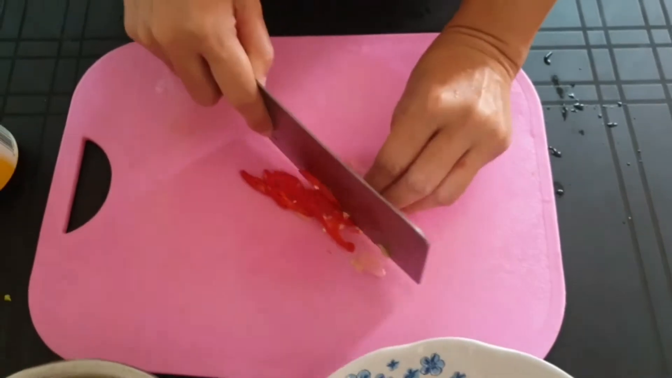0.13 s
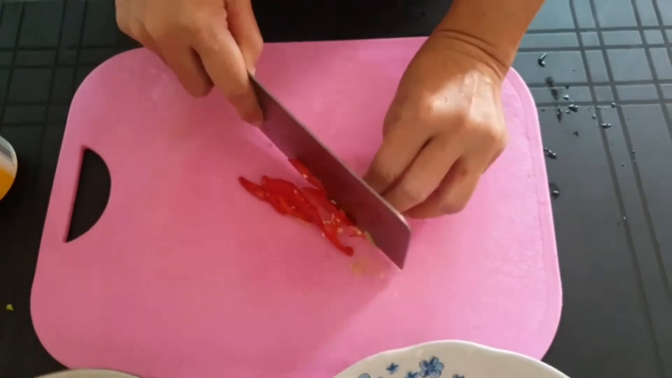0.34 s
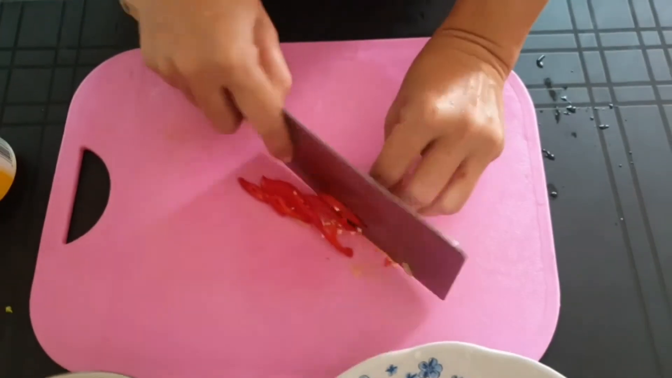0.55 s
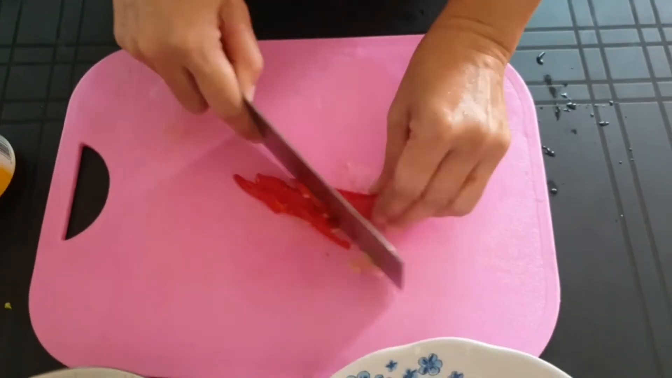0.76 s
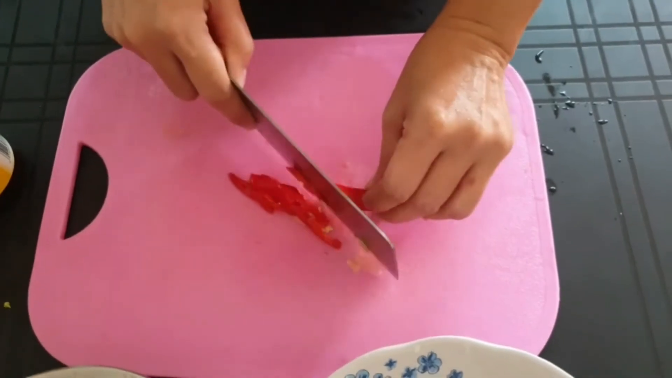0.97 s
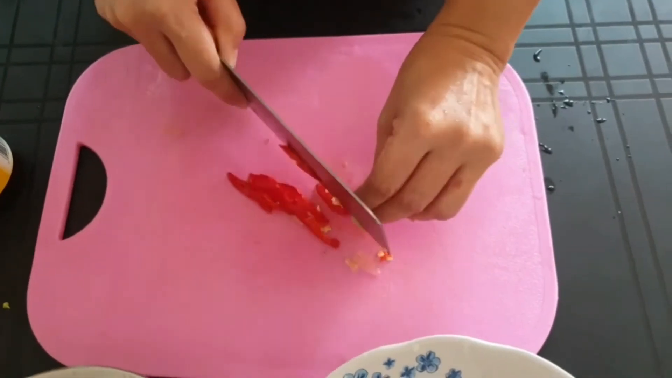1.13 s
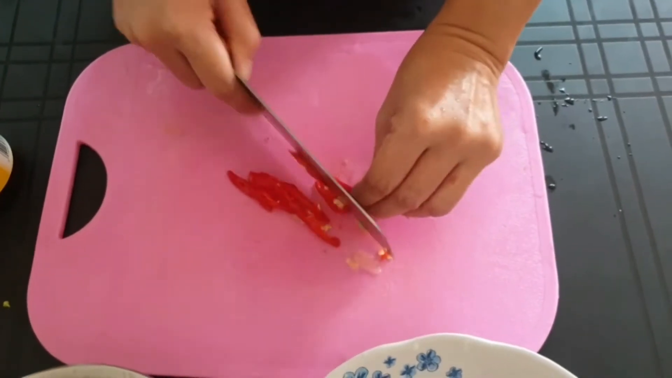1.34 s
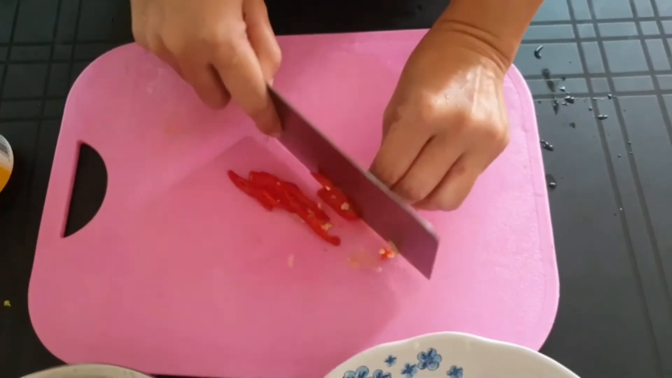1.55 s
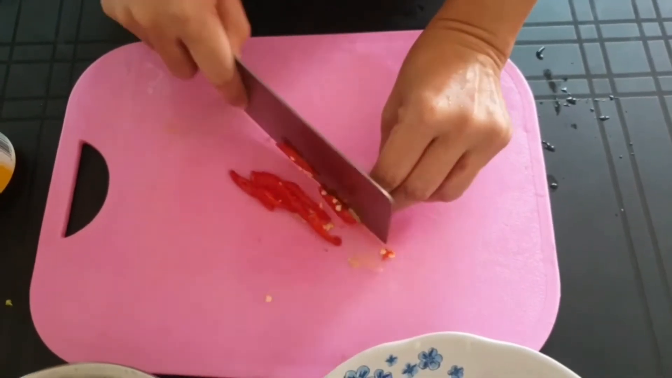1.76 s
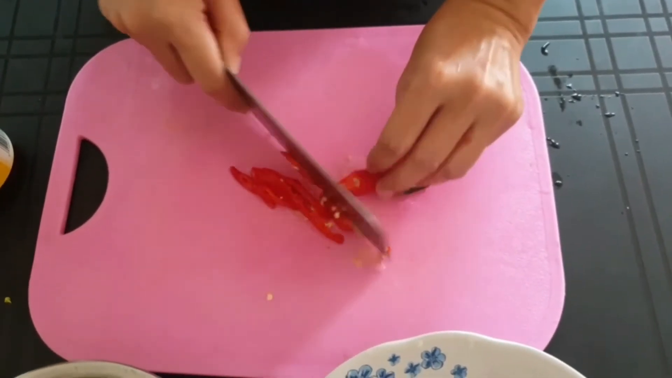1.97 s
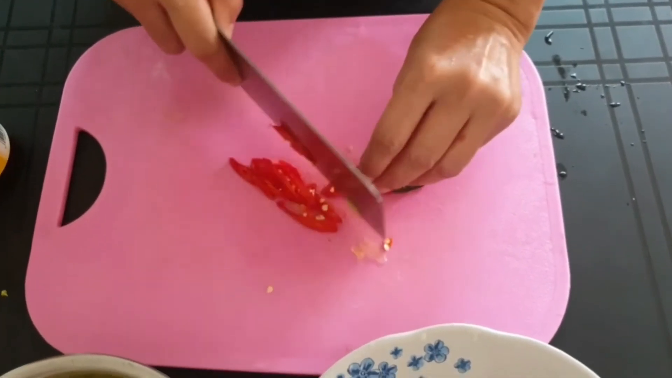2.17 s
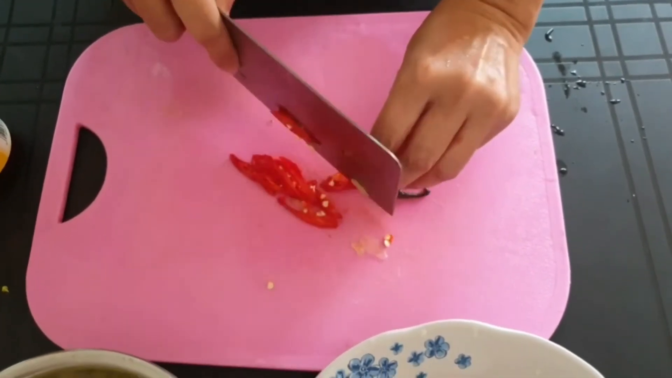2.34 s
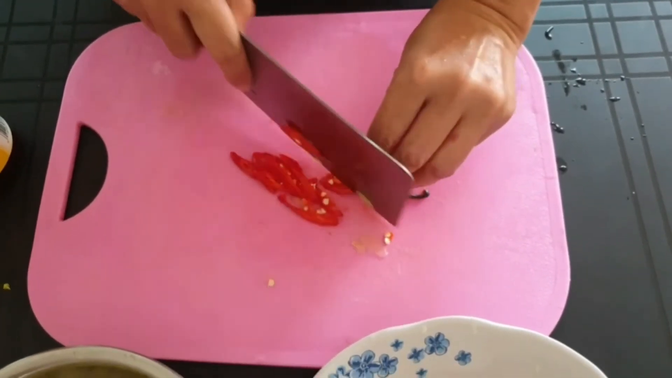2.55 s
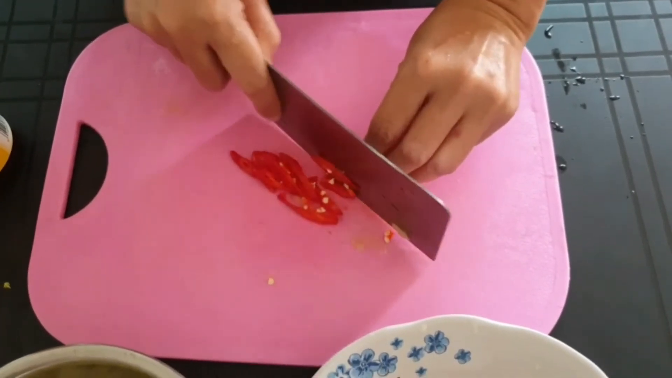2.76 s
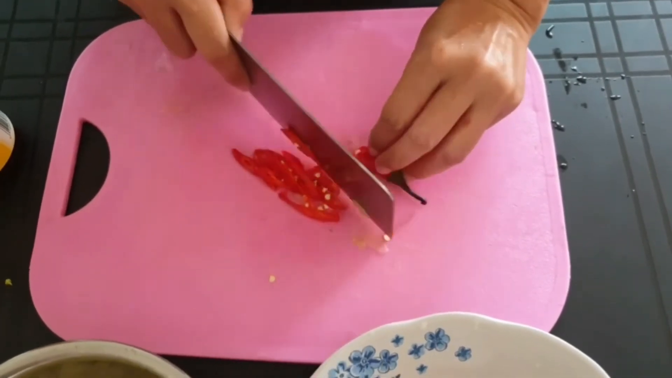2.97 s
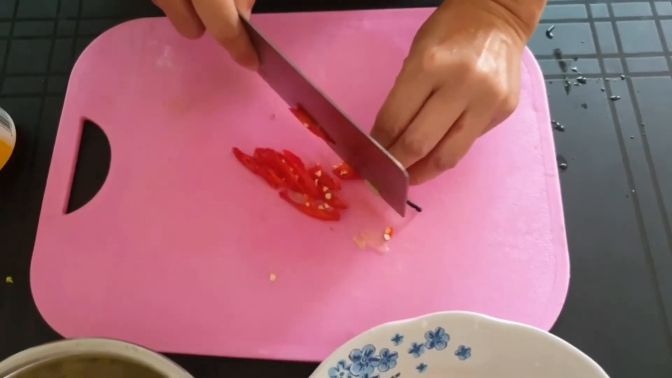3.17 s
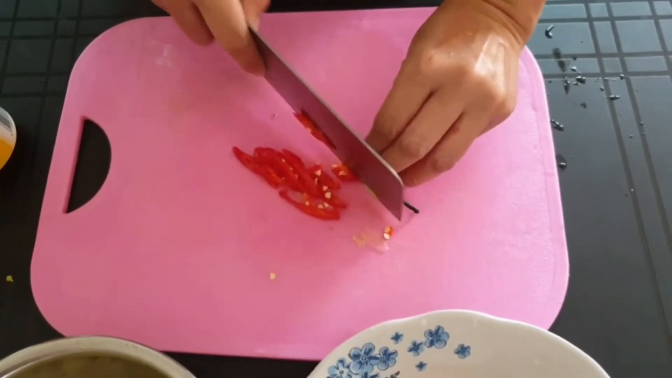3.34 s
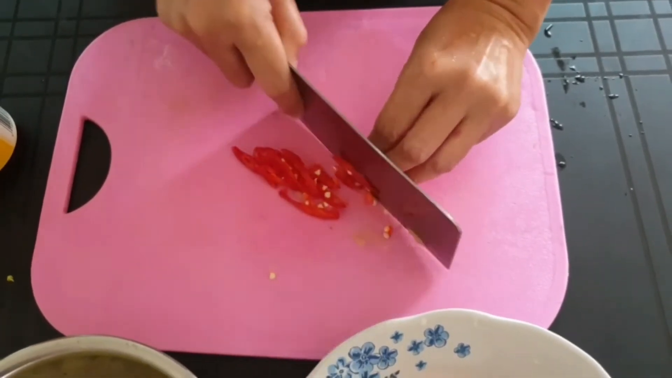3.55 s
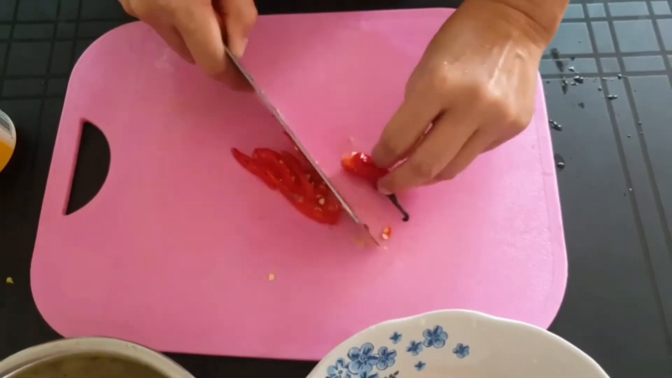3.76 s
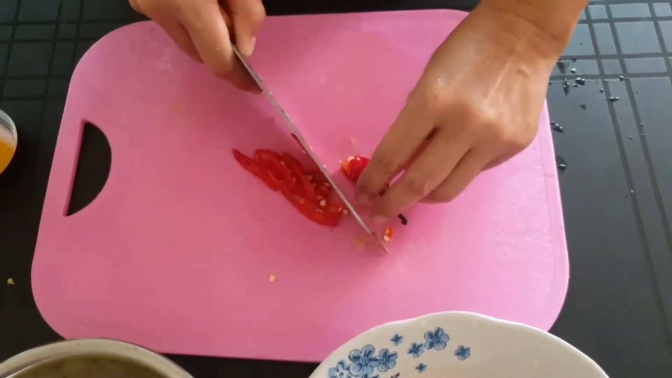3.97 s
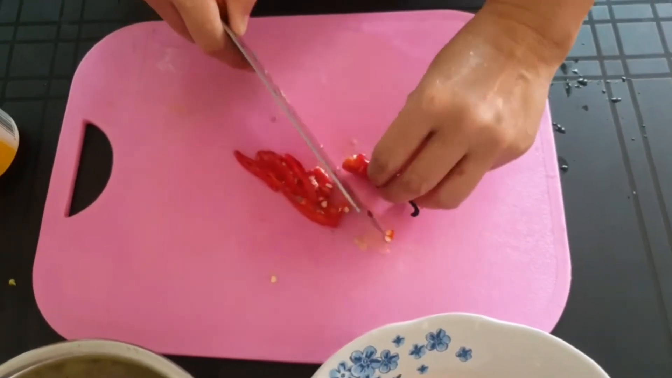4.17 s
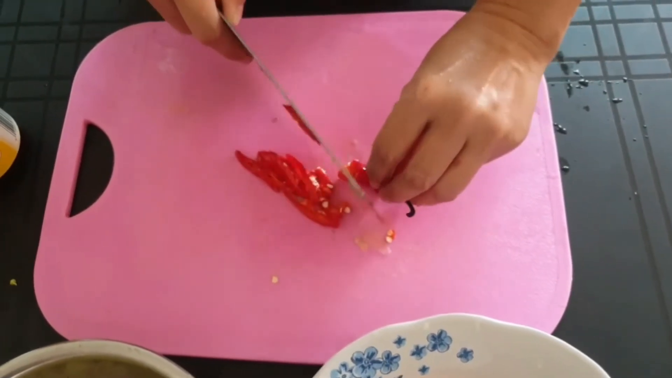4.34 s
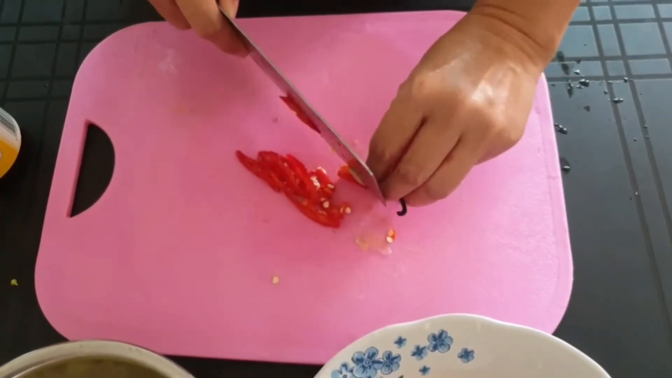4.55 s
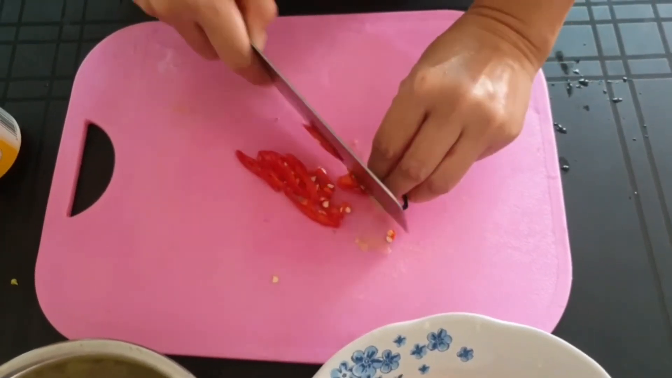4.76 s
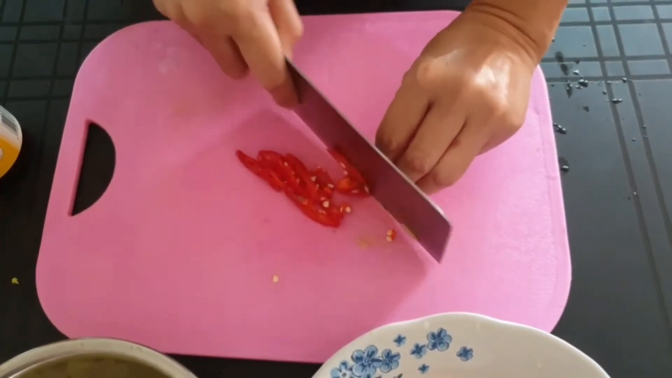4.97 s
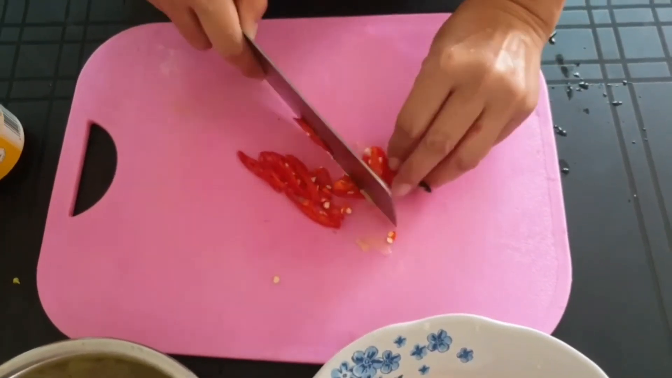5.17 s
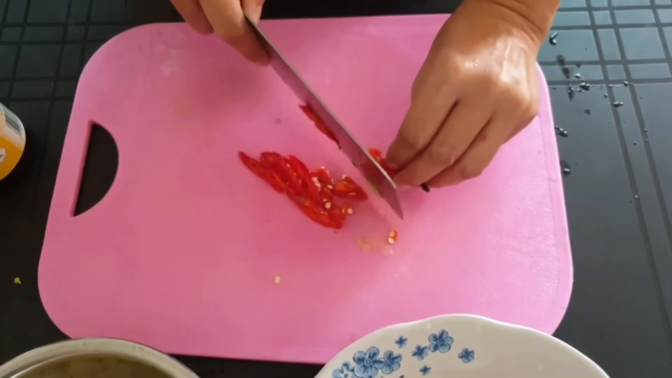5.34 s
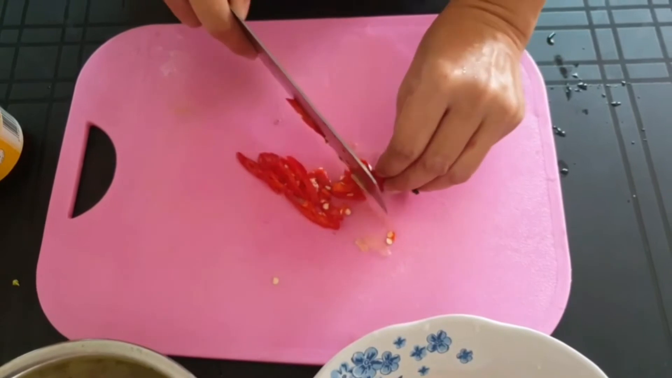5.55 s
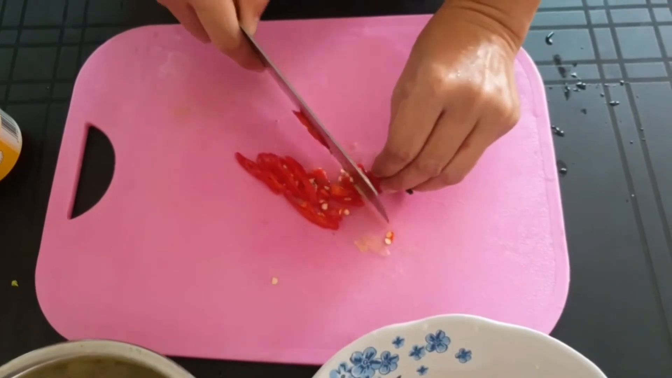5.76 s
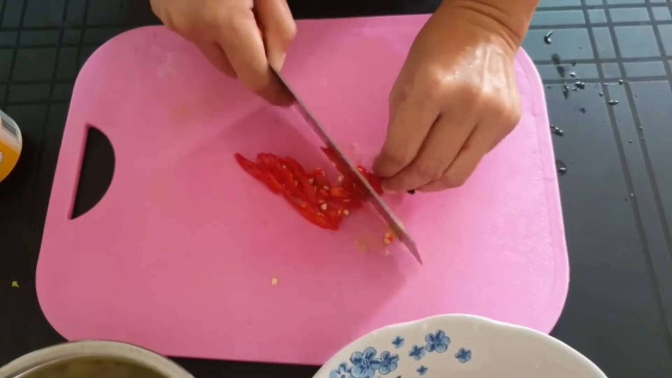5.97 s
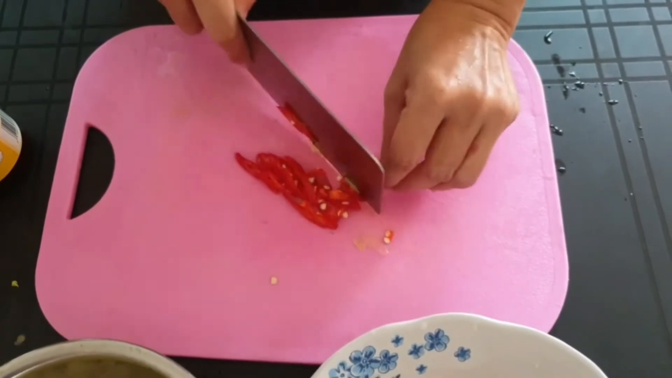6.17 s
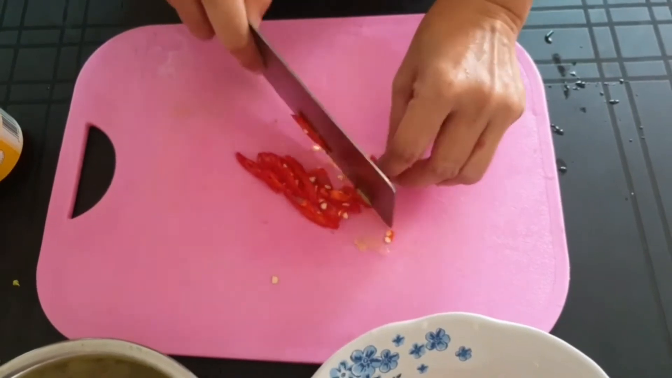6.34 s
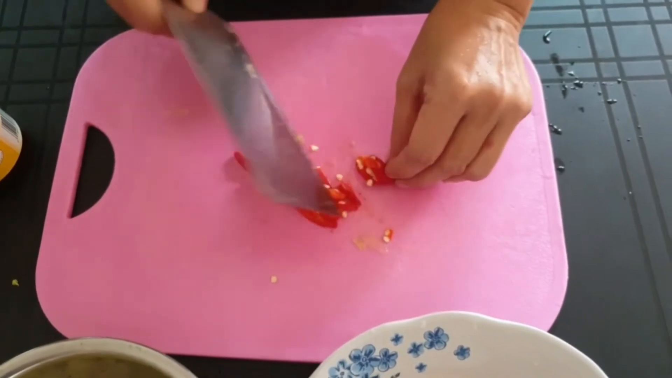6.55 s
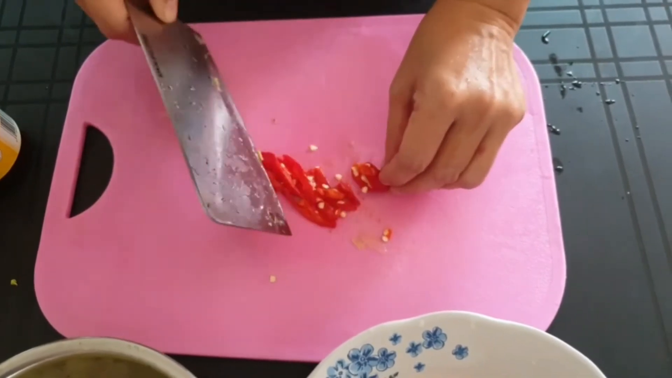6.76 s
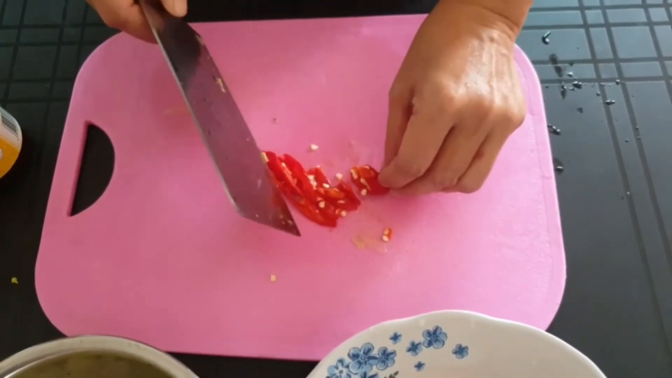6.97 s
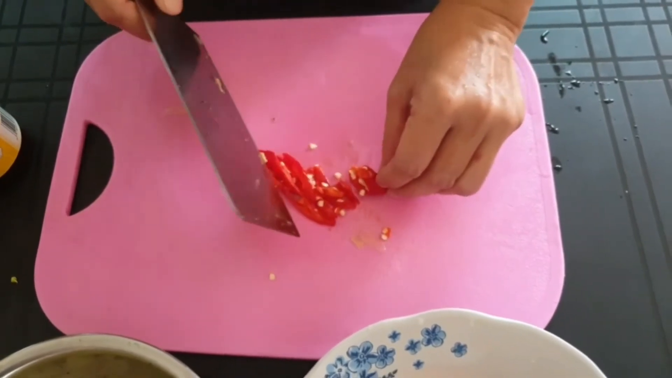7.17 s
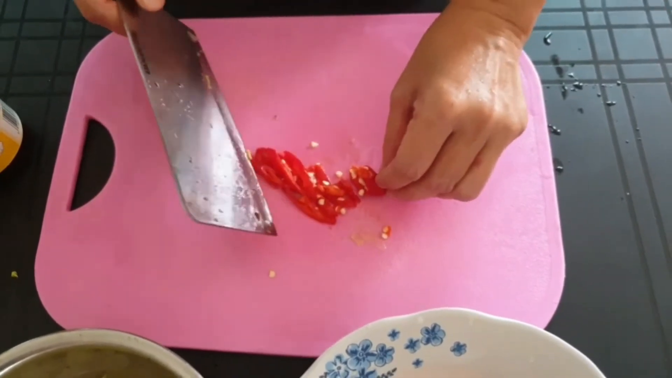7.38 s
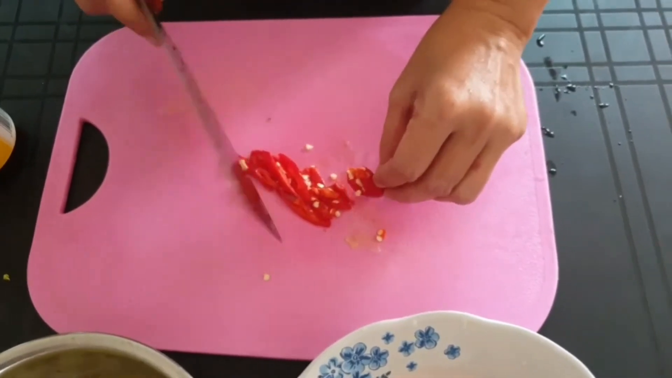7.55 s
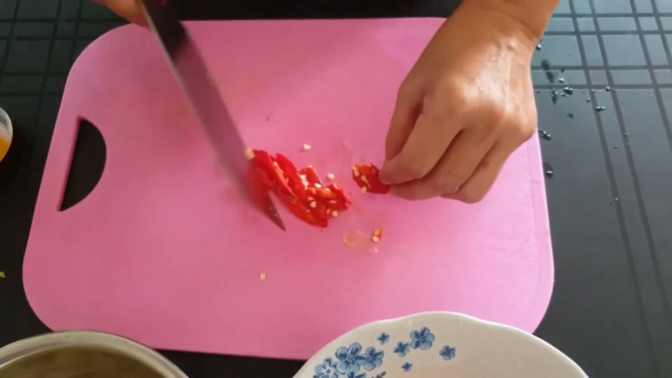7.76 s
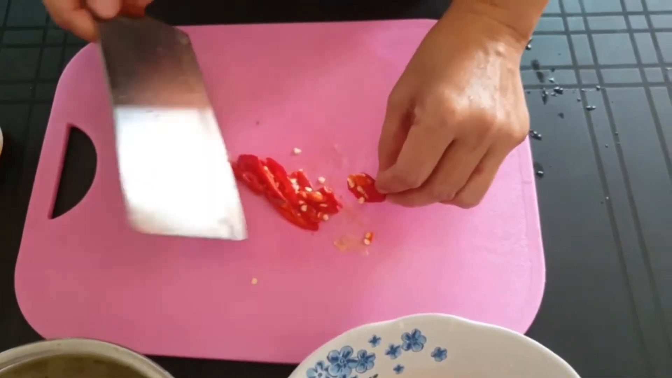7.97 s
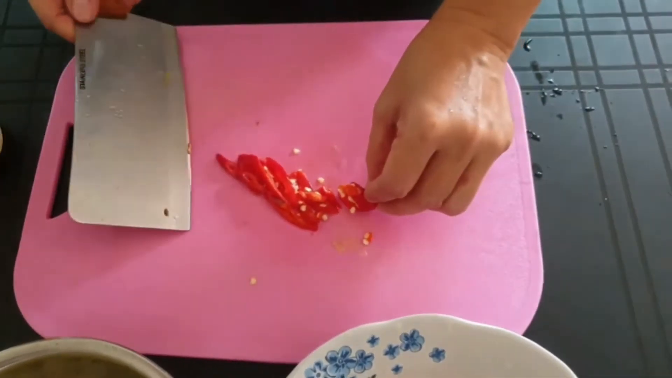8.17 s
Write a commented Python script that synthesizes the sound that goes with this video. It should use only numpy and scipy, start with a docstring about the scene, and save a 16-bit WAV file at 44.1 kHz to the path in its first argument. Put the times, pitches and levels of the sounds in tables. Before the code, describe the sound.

Close up, a cleaver pushes through chili on a thin plastic board: grainy tearing hiss, brief rasps and squeaks, sharp bright snaps, then low hollow knocks as the edge lands. Strokes come in uneven bursts with short gaps until about six and a half seconds. Then mostly quiet room air, faint insect whine, distant soft coos and two dull counter bumps. Wide stereo, small room.

```python
"""Chili sliced on a plastic board

A cleaver slices chili on a thin plastic board on a kitchen counter. Each push crunches and scrapes:
shaped noise through blade, rasp and squeak resonances, with noise bursts for snaps.
The board booms and the edge knocks down: dying sines, shaken by noise or struck.
Insects whine outside and a far bird coos (noise bands); the counter is bumped twice (sines)."""
import sys
import numpy as np
from scipy import signal
from scipy.fft import irfft
from scipy.io import wavfile
from scipy.ndimage import uniform_filter1d

SR = 44100
rng = np.random.default_rng(int(sys.argv[2]) if len(sys.argv) > 2 else 0)


def output_pcm(signal):
    """Save a mono or channel-first signal as 16-bit PCM at the path in sys.argv[1].

    Samples are clipped to [-1, 1] before scaling.
    """
    pcm = np.clip(np.atleast_2d(signal).T, -1, 1) * 32767
    wavfile.write(sys.argv[1], SR, np.round(pcm).astype(np.int16))


N = 362187

# Blade pushes. Each row: end in s, length in s, tearing reference level in dB, swell over the push in dB,
# rasp and squeak in dB against that reference, weight on the board in dB, lift of its higher modes in dB.
PUSHES = [(0.012, 0.019, -49, -7, -2.5, -3.5, -39, 4), (0.193, 0.075, -55, -0.5, -6.5, -13, -56.5, 1.5),
          (.278, 0.012, -65.5, -2, -7, -11, -67, -1), (.398, 0.0076, -70, 1, -16, -5, -39.5, -1.5),
          (0.621, 0.099, -53.5, 5, -2, -7.5, -42, 6), (.764, .004, -59.5, 1, -7, -10, -48.5, -1.5),
          (.87, 0.023, -78, 4, -2, -6, -44, -5), (1.255, 0.046, -74.5, 1, 4.5, 3.5, -85, -5),
          (1.335, 0.029, -79.5, -6, 0, 2.5, -78, -5), (1.42, 0.0067, -55.5, 3.5, -1, 1, -42, -4),
          (1.517, 0.067, -47, -1.5, -3.5, -4.5, -45.5, -3.5), (1.779, 0.082, -46, 6.5, 0, -9, -25.5, -2),
          (1.924, 0.059, -51, 4.5, -2, -6, -47, 5.5), (2.076, 0.0051, -54, 0.5, -5, -7, -45.5, -4),
          (2.492, 0.038, -80, -2, 2, -2, -65.5, 3), (2.6, 0.0095, -61, 3, -13, 4, -46, 0),
          (2.649, 0.027, -49.5, 1.5, -15, -2, -36, -9), (2.749, 0.075, -45, 4.5, -2.5, -8.5, -37.5, 0),
          (2.898, .004, -49.5, 0.5, -2.5, -5, -41, 0), (3.025, 0.024, -72, -7.5, -9, -10, -45, 6.5),
          (3.48, 0.019, -51, 2.5, -18, 0, -40, -1), (3.525, 0.018, -45, -2, -2, -4.5, -30.5, 0),
          (3.591, 0.019, -54.5, 0, 0, -4, -41, 5.5), (3.73, 0.043, -52, 7, -7.5, -8, -52.5, 6.5),
          (3.832, 0.072, -55.5, 3.5, -1, -7, -39.5, -1), (4.82, 0.045, -50.5, 2.5, -12, -6.5, -44.5, -2),
          (4.901, 0.045, -46, -2.5, -5, -5, -29, -3), (5.099, 0.038, -55, 5.5, -7, -15, -44, 2),
          (5.15, 0.026, -53.5, -0.5, -5, -5.5, -53, 0.5), (5.289, 0.014, -68.5, 0, 0, -13, -37, 2.5),
          (5.802, .009, -66.5, 0, -21.5, -4.5, -86, -8), (5.921, 0.045, -45, -1, -7, -1, -45.5, -3.5),
          (6.015, 0.08, -47.5, 2.5, -5.5, -2.5, -42, -4), (6.208, 0.092, -48.5, 4, -2.5, -10.5, -29.5, -1),
          (6.366, 0.064, -54.5, -4.5, -4.5, -8, -48.5, 5.5), (6.5, .01, -70.5, -0.5, 0.5, -13, -55, -2),
          (7.307, .103, -74.5, 1, -13.5, -13.5, -83, -3), (7.464, 0.036, -70.5, 0, -15, -14, -53, -5)]
# Edge meets board. Each row: start in s, blow level in dB, centre of the favoured low modes in Hz,
# then middle modes, upper modes and crack in dB against the blow.
KNOCKS = [(0.384, -37.5, 135, -25, -34, -28), (0.53, -40, 180, 4, -6, -23), (0.792, -40, 170, -8, -25, -30),
          (0.875, -26.5, 197, -2.5, -21, -23.5), (1.456, -30.5, 138, -10, -22, -20),
          (1.716, -22.5, 137, -20, -8, -21), (1.778, -9.5, 170, -31, -19.5, -18),
          (1.869, -30, 183, -9, -2, -8), (2.032, -39, 153.4, -11, -8, -10),
          (2.074, -38.5, 190, -15, -7, -28), (2.636, -29, 138, -7.5, -8.5, -24),
          (2.721, -21.5, 139, -7, -16, -19), (2.76, -19.5, 178, -7, -18, -28),
          (3.029, -25.5, 136, -16, -20, -26), (3.479, -24, 140, -14, -32, -22),
          (3.517, -22, 183, -2, -7, -6.5), (3.794, -36, 177, -13, -4, -8),
          (3.847, -34.5, 134, -8, -10, -12), (3.975, -46, 175, -8, -25, -35.5),
          (4.839, -28, 139, -8, -27, -16), (4.884, -22.5, 135, -20, -43, -13),
          (5.06, -41, 180, -4, -25, -35), (5.278, -32, 134, 2, -9, -29), (5.917, -27.5, 135, -3, -6, -12),
          (6.019, -26.5, 148, 0.5, -7, -6.5), (6.127, -27.5, 144, -20, -5.5, -31),
          (6.187, -16.5, 134, -21, -41, -14), (6.481, -38, 177, -2.5, -27, -27)]
# Low, middle and upper modes of the board on the counter. Each row: frequency in Hz, level in dB, t60 in s.
BOARD = [(99, -28, 0.09), (140.8, 0.5, 0.201), (172, -1, 0.11), (182.9, 1.5, 0.14), (212.7, -12.5, 0.69)]
MIDDLE = [(250, -4.5, 0.04), (288.1, 1.5, 0.14), (331, -6, 0.063), (360.5, -8.5, 0.094)]
UPPER = [(490, -6, 0.1), (653, 7, 0.026), (783.4, 3.5, 0.027), (916, 7, 0.021), (1246, -1.5, 0.0083)]


def gain_of(db):
    """Amplitude factor of a level in dB."""
    return 10 ** (np.asarray(db) / 20)


def evened(x):
    """Scales to an overall RMS of 1."""
    return x / np.sqrt(np.mean(x ** 2) + 1e-20)


def read(points, hz):
    """Interpolates (Hz, value) points over log frequency."""
    f, value = np.transpose(points)
    return np.interp(np.log(hz + 1), np.log(f + 1), value)


def add(mix, start_s, sound):
    """Adds a sound in place, cut at the end of the mix."""
    part = mix[..., round(start_s * SR):][..., :sound.shape[-1]]
    part += sound[..., :part.shape[-1]]


def resonate(x, hz, width_hz):
    """Shifts hz down to zero, smooths, and shifts back: a resonance of gain 1."""
    turn = np.exp(2j * np.pi * np.cumsum(hz * np.ones(x.shape[-1])) / SR)
    r = np.exp(-np.pi * width_hz / SR)
    return 2 * (turn * signal.lfilter([1 - r], [1, -r], x / turn)).real


def noise(spectrum, same, patchy_db, size, lean=((1, 0), (2, 0))):
    """Two-channel noise from random short-time spectra with drifting patches."""
    frames, hz = 4 * N // size + 5, np.fft.rfftfreq(size, 1 / SR)
    a, b, c, d, patches = rng.standard_normal((frames, len(hz), 5)).T
    patches = uniform_filter1d(patches, size=4, axis=0)  # over frequency
    patches = evened(uniform_filter1d(patches, size=12, axis=1))  # over time
    like = np.clip(read(same, hz), -1, 1)[:, None]
    left = a + 1j * b
    right = like * left + np.sqrt(1 - like ** 2) * (c + 1j * d)
    z = np.array([left, right])
    z *= gain_of(np.outer([.5, -.5], read(lean, hz)))[:, :, None]
    z *= gain_of(read(spectrum, hz)[:, None] + patchy_db * patches)
    return evened(signal.istft(z, nperseg=size, noverlap=3 * size // 4)[1][:, :N])


def ring(modes, length_s, weight_db=0):
    """Sum of dying sines."""
    t = np.arange(round(length_s * SR)) / SR
    hz, db, t60_s = np.transpose(modes)[:, :, None]
    return (gain_of(db + weight_db - 60 * t / t60_s) * np.sin(2 * np.pi * hz * t)).sum(0)


def radiated(x):
    """A thin small board radiates little deep bass."""
    return signal.sosfilt(signal.butter(3, 105, "high", fs=SR, output="sos"), x)


def pushed(peak_db, shape):
    """Gain of a layer: each push rises, swells, falls and lingers; their powers add."""
    rise, extra, fall, linger_db, linger_fall = shape
    t, power = np.arange(0, N, 32) / SR, 0
    for (end_s, length_s, _, swell_db, *_), db in zip(PUSHES, peak_db):
        early, late = np.maximum(end_s - t, 0), np.maximum(t - end_s, 0)
        swelling_db = -(swell_db / length_s + extra) * np.minimum(early, length_s)
        rising_db = -rise * np.maximum(early - length_s, 0)
        power = power + gain_of(db + swelling_db + rising_db - fall * late) ** 2
        power = power + (t > end_s) * gain_of(db + linger_db - linger_fall * late) ** 2
    return np.interp(np.arange(N) / SR, t, np.sqrt(power))


def dragging():
    """The edge eases its drag by up to 8 dB as it lands, so the board rings freely for a moment."""
    t = np.arange(N) / SR
    still = np.zeros(N)
    for start_s, *_ in KNOCKS:
        still[(t > start_s - .008) & (t < start_s + .03)] = 1
    return gain_of(-8 * uniform_filter1d(still, size=300))


def shaken(group):
    """Drive of one mode group: the blade's weight and tearing, plus the shudder after each blow."""
    # Low, middle, upper group. Each row: share of weight against tearing, level in dB, push shape
    # (rise, extra swell, fall in dB/s, lingering in dB, its fall in dB/s), shudder in dB, its fall in dB/s.
    shakes = [(0.81, 1.5, (596.5, 117.5, 242.5, -12.5, 61), -10.5, 230.5),
              (0.51, -1.5, (596, 87.5, 246.5, -10, 78.5), -8.5, 227), (.3, -6.5, (474, 41, 302, -2.5, 92),
              -19, 250.5)]
    share, db, shape, shudder_db, fall = shakes[group]
    _, _, tear_db, _, _, _, weight_db, lift_db = np.transpose(PUSHES)
    peak_db = db + share * weight_db + (1 - share) * tear_db + group / 2 * lift_db
    power, t = pushed(peak_db, shape) ** 2, np.arange(SR // 2) / SR
    for start_s, blow_db, _, middle_db, upper_db, _ in KNOCKS:
        group_db = (0, middle_db, upper_db)[group] / 2
        add(power, start_s, gain_of(blow_db + group_db + shudder_db - fall * t) ** 2)
    return np.sqrt(power)


def background():
    """Room air, a wavering hum and the insect band, all as shaped noise."""
    # Relative spectra. Each row: frequency in Hz, density in dB.
    air_spectrum = [(15, -40), (30, -11), (60, 0.5), (113, -2), (173, -16.5), (233, -12), (523, -17),
                    (722, -18.5), (1200, -24), (2000, -25), (4260, -30.5), (6730, -30.5), (9500, -24.5),
                    (11000, -32.5), (15500, -30)]
    whine_spectrum = [(6900, -43.5), (7150, -8), (7500, 0.5), (7900, -2.5), (8150, -18)]
    # Each row: frequency in Hz, left-right likeness from 0 to 1.
    likeness = [(40, 0.82), (200, 0.76), (700, 0), (2000, 0), (12000, 0.0038)]
    # Each row: centre in Hz, width in Hz, RMS level in dB.
    hum_bands = [(115, 4.89, -73.5), (236.7, 20, -78)]
    hum = sum(gain_of(db) * evened(resonate(rng.standard_normal(N), hz, width_hz))
              for hz, width_hz, db in hum_bands)
    whine = noise([(6400, -68.0)] + whine_spectrum + [(8600, -75)], likeness, patchy_db=1.0, size=512)
    air = noise(air_spectrum, likeness, patchy_db=3.0, size=1024)
    return gain_of(-68.5) * air + gain_of(-67) * whine + hum


def crunch():
    """Fibres tear in a grainy hiss that rings the blade; the edge rasps and squeaks below it."""
    # Relative tearing spectrum. Each row: frequency in Hz, density in dB.
    tear_spectrum = [(3000, -30), (3700, -8), (6340, -3.5), (8340, -4.5), (10000, -4.5), (14500, -5),
                     (15500, -3.5)]
    # Each row: frequency in Hz, left-right likeness from 0 to 1.
    likeness = [(40, 0.99), (150, 0.99), (350, 0.79), (700, 0.019), (1500, 0.16), (4000, 0), (12000, 0.032)]
    # Each row: frequency in Hz, left over right in dB.
    tear_lean = [(60, 2.5), (110, -5.5), (200, -7), (380, -5), (700, -12), (1290, -3), (2380, 3.5),
                 (4400, 1.0), (8120, 4.5), (15000, -1)]
    # Blade rings. Each row: frequency in Hz, width in Hz, level in dB.
    blade_rings = [(4476, 970, -2.5), (5270, 220, -14.5), (9100, 490, -1), (10860, 290, -4.5),
                   (12200, 200, -22)]
    # Edge on plastic, edge in wet skin. Each row: frequency in Hz, width of each of two passes in Hz, level in dB.
    rasp_modes = [(1406, 500, -1.5), (1780, 450, 2.5), (2076, 450, -4)]
    squeak_modes = [(2590, 440, -1.5), (2953, 360, 1.5), (3380, 530, -6.5)]
    # Push shapes: rise, extra swell and fall in dB/s, lingering in dB, its fall in dB/s.
    tear_shape = (450, 0, 250, -9.5, 79)
    rasp_shape = (458, 79.5, 278, -8, 99)
    squeak_shape = (500.5, -59, 420.5, -4.5, 109)

    grains = gain_of(0.5 * evened(uniform_filter1d(rng.standard_normal(N), size=130)))
    cracks = gain_of(4.0 * np.minimum(rng.exponential(1, N), 2.5))
    cracks *= rng.random(N) < 250 / SR  # about 250 per second
    flares = signal.lfilter([1], [1, -np.exp(-1 / (0.001 * SR))], cracks)
    grains *= 1 + 0.23 * flares  # single fibres flare briefly
    hiss = noise([(1, -84)] + tear_spectrum, likeness, patchy_db=2, size=512, lean=tear_lean) * grains
    blade = sum(gain_of(db) * resonate(hiss, hz, width_hz) for hz, width_hz, db in blade_rings)
    _, _, tear_db, _, rasp_db, squeak_db, _, _ = np.transpose(PUSHES)
    out = pushed(tear_db + 4.0, tear_shape) * evened(hiss + blade)

    drive_spectrum = [(500, -45.5), (1000, -0.5), (4000, 1), (6000, -41)]
    scrapes = ((rasp_modes, rasp_db, rasp_shape), (squeak_modes, squeak_db, squeak_shape))
    for modes, over_db, shape in scrapes:
        drive = noise(drive_spectrum, likeness, patchy_db=2.0, size=512) * grains
        # the contact moves along the blade
        drift = 1 + 0.049 * evened(uniform_filter1d(rng.standard_normal(N), size=2500))
        rung = np.zeros((2, N))
        for hz, width_hz, db in modes:
            once = resonate(drive, hz * drift, width_hz)
            rung += gain_of(db) * resonate(once, hz * drift, width_hz)
        out += pushed(tear_db + over_db, shape) * evened(rung)
    return out


def rumble():
    """The dragging edge shakes each mode group with uneven pushes, each with its own left-right difference."""
    # The counter below. Each row: frequency in Hz, level in dB, t60 in s.
    counter = [(48, 0, .2)]
    unevenness = gain_of(1.9 * evened(uniform_filter1d(rng.standard_normal(N), size=600)))
    drives = rng.standard_normal((4, 2, N)) * unevenness
    drives[[0, 1, 3]] *= dragging()  # all but the upper modes
    # body, drive group, level in dB, left-right difference
    groups = ((radiated(ring(BOARD, 0.38)), 0, -1.0, 0.033),
              (radiated(ring(MIDDLE, 0.38)), 1, 0.0, .15),
              (radiated(ring(UPPER, 0.38)), 2, -2.0, 0.68),
              (ring(counter, .4), 0, -16.5, .25))
    out = np.zeros((2, N))
    for drive, (body, group, db, side) in zip(drives, groups):
        push = shaken(group) * evened(drive[0] + np.outer([side, -side], drive[1]))
        body = body / np.linalg.norm(body)
        out += gain_of(db) * signal.oaconvolve(push, body[None], axes=1)[:, :N]
    return out


def snaps():
    """Skin and seeds snap: sharp ticks of splinter noise, a bright and a dull part."""
    # Each row: start in s, level in dB ahead of a common trim, left over right in dB, dull against bright in dB.
    snap_rows = [(0.0152, -26.5, 8.5, -14), (0.5674, -48, 1.5, -11), (1.4084, -33, 5, -15),
                 (1.454, -22.5, 2.5, -16), (1.5254, -36, -3, -16), (1.6758, -33, 0, -7),
                 (1.716, -30, 1, 5.5), (1.73, -25.5, -2.5, -25), (1.747, -45, -3, -9),
                 (1.7614, -39, 0.5, -14), (1.7779, -28, 5, -14), (1.9267, -29.5, 0.5, -3),
                 (2.0303, -42.5, 6, -20), (2.5795, -43, 4, -16), (2.627, -35, 3, 1), (2.739, -35, -3, 0),
                 (2.8851, -35.5, 3, 7), (3.4405, -41, 4, -17), (3.4645, -32, 5, -14), (3.504, -33, -1, -7),
                 (4.7683, -42, 0.5, -15), (4.8444, -39, -3, -14), (4.8638, -25.5, -2, -12),
                 (4.897, -41, 1.5, -17), (5.1375, -30, -2, -17), (5.2764, -41.5, 3.5, -17),
                 (5.7882, -41, 1.5, -23), (5.8765, -32, 8, -13), (5.898, -24.5, 6, -19),
                 (6.1248, -28, -3, -4.5), (6.1853, -26.5, -1, -2), (6.3343, -30, 1.5, -11),
                 (6.362, -24.5, 3, -19)]
    # Lowest and highest centre of the bright part, in Hz.
    bright_range_hz = (7500, 12300)
    t60_s, rise_s, trim_db = 0.028, 0.00043, -10.5
    out, t = np.zeros((2, N)), np.arange(900) / SR
    for start_s, db, pan_db, dull_db in snap_rows:
        splinter = rng.standard_normal((2, len(t)))  # each channel has its own noise
        hz = rng.uniform(*bright_range_hz)
        bright = evened(resonate(resonate(splinter, hz, 8360), hz, 8360))
        dull = evened(resonate(splinter, 2075, 2200))
        envelope = gain_of(db + trim_db - 60 * t / t60_s) * np.minimum(t / rise_s, 1)
        tick = (bright + gain_of(dull_db) * dull) * envelope
        add(out, start_s, tick * gain_of([[pan_db / 2], [-pan_db / 2]]))
    return out


def knocks():
    """Each blow favours the low modes near its centre; a tick and a short crack ride on top."""
    # Steel touches plastic. Each row: frequency in Hz, level in dB, t60 in s.
    edge_tick = [(1100, -1.5, 0.0059), (1930, -5, 0.008)]
    out, t = np.zeros(N), np.arange(1300) / SR
    contact = np.hanning(round(0.004 * SR))  # soft plastic lengthens the contact
    middle = radiated(np.convolve(ring(MIDDLE, .4), contact))
    top = ring(UPPER, .15)
    top *= gain_of(-60 * np.arange(len(top)) / SR / 0.012)  # dies faster than the modes alone
    for start_s, db, centre_hz, middle_db, upper_db, crack_db in KNOCKS:
        nearness_db = -14 * abs(np.log2(np.transpose(BOARD)[0][:, None] / centre_hz))
        low = radiated(np.convolve(ring(BOARD, .4, nearness_db), contact))
        boom = low / abs(low).max() + gain_of(middle_db) * middle / abs(middle).max()
        add(out, start_s, -gain_of(db) * boom)
        add(out, start_s, gain_of(db + upper_db) * top / abs(top).max())
        add(out, start_s, gain_of(db - 26.5) * ring(edge_tick, 0.011))
        crack = resonate(rng.standard_normal(len(t)), 7000, 7500)
        add(out, start_s, gain_of(db + crack_db - 2 - 60 * t / 0.018) * crack)
    return out


def coos():
    """Soft far notes of narrow-band noise that swell, fade and glide in pitch."""
    # Each row: start in s, length in s, level in dB, first and last centre in Hz.
    coo_rows = [(4.35, 0.28, -76, 723, 740), (7.022, 0.23, -74.5, 735, 696), (7.304, 0.48, -66.5, 715, 670),
                (7.837, 0.23, -73.5, 726, 660)]
    peak_share, ends_db = 0.26, -7.5  # share of the note at its loudest; ends ahead of the taper
    out = np.zeros(N)
    for start_s, length_s, db, first_hz, last_hz in coo_rows:
        u = np.arange(0, length_s, 1 / SR) / length_s
        note = resonate(rng.standard_normal(len(u)), first_hz + (last_hz - first_hz) * u, 40)
        arch_db = np.interp(u, [0, peak_share, 1], [ends_db, 0, ends_db])
        add(out, start_s, gain_of(db + arch_db) * evened(note) * signal.windows.tukey(len(u), .2))
    return out


def bumps():
    """Dull thuds through the counter: two dying sines with a 21 ms rise."""
    # Each row: start in s, level in dB, frequency in Hz, t60 in s.
    bump_rows = [(7.438, -40.5, 104.2, 0.3), (7.836, -29.5, 65.3, 0.17)]
    out = np.zeros(N)
    for start_s, db, hz, t60_s in bump_rows:
        thud = ring([(hz, db, t60_s), (2.1 * hz, db - 14.0, t60_s)], .4)
        add(out, start_s, thud * np.minimum(np.arange(len(thud)) / SR / 0.021, 1))
    return out


def spread(x):
    """Mono to two channels with phase scattered over frequency; the left is 70 us later."""
    # Each row: frequency in Hz, left-right phase scatter in rad.
    scatter = [(40, 0.43), (90, .15), (180, 0.04), (350, 0.23), (700, 1), (1500, 5.4), (12000, 1.7)]
    hz = np.fft.rfftfreq(1024, 1 / SR)
    wander = evened(uniform_filter1d(rng.standard_normal(len(hz)), size=3)) * read(scatter, hz)
    lag = 2 * np.pi * hz * 7e-5
    turn = np.outer([-.5, .5], wander + lag) - np.pi * np.arange(len(hz))  # centred at sample 512
    return signal.oaconvolve(x[None], irfft(np.exp(1j * turn)), axes=1)[:, 512:N + 512]


def kitchen(x):
    """Echoes of random sign and spacing that die away (t60 0.67 s), other ones per channel."""
    at = np.arange(200, SR // 2, 20)
    taps = np.zeros((2, SR // 2 + 20))
    places = at + rng.integers(0, 20, (2, len(at)))
    np.put_along_axis(taps, places, rng.choice([-1., 1.], (2, len(at))), 1)
    taps *= gain_of(-60 * np.arange(taps.shape[1]) / SR / 0.67)
    x = radiated(x)  # deep bass finds no echo of its own in so small a room
    return signal.oaconvolve(x, taps / np.linalg.norm(taps[0]), axes=1)[:, :N]


def scene():
    """Board sounds near the middle, crunch wide, all in a small room."""
    near = spread(knocks() + bumps() + coos()) + rumble() + crunch() + snaps()
    return near + gain_of(-18.5) * kitchen(near) + background()


def record(dry):
    """Leans 0.6 dB to the right, then limits the band to 15550 Hz."""
    leaned = dry * gain_of([[-.3], [.3]])
    lowpass = signal.firwin(511, 15550, window=("kaiser", 9), fs=SR)
    return signal.oaconvolve(leaned, lowpass[None], "same")


dry = scene()
out = record(dry)
output_pcm(out)
```